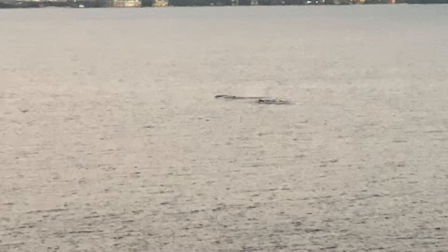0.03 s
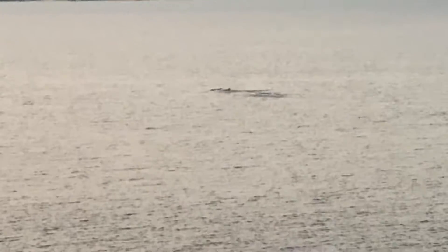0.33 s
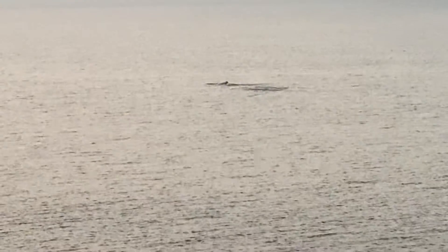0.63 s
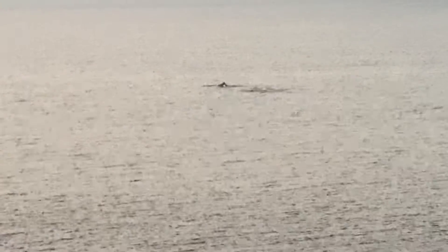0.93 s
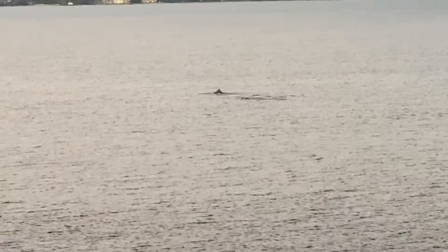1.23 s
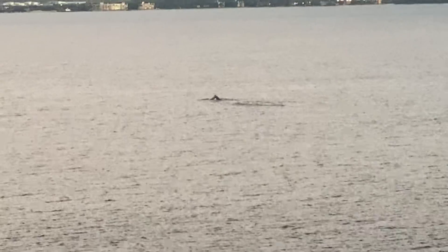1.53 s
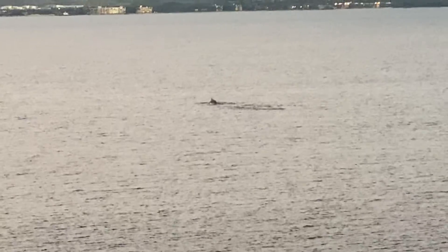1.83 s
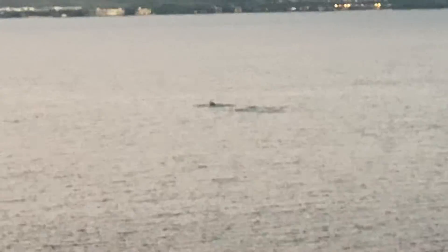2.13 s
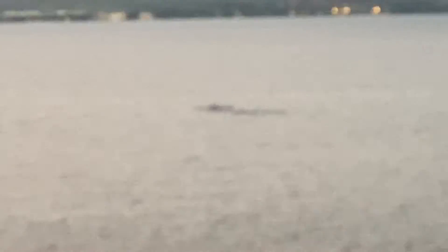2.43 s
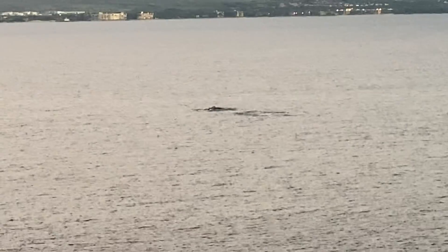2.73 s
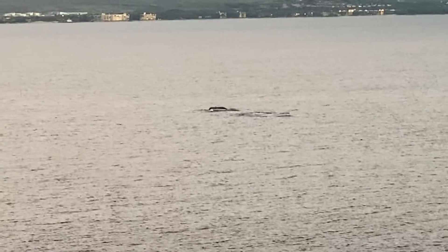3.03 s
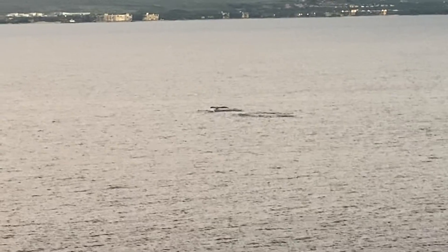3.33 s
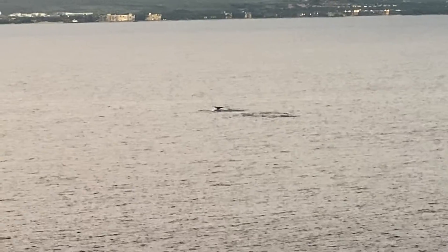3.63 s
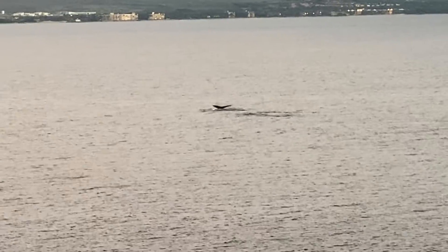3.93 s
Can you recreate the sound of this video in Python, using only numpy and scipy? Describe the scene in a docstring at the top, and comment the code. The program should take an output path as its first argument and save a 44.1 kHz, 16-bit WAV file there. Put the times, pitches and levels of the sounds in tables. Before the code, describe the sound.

Wind buffets the microphone in uneven gusts over a faint wash of distant water.

```python
"""Above the sea, a microphone held out in gusty wind. Right at its port, large eddies rumble and thump,
small ones tear off in a ragged flutter and crackle, and the sharpest of them pop. Far off, the water
washes faintly; it shows in a short lull near 2.4 s, just before a strong gust hits the microphone.
The wind sits close and almost dead centre, with a thin, wider hiss behind it."""
import sys
import numpy as np
from scipy import signal
from scipy.fft import rfft, irfft, next_fast_len
from scipy.io import wavfile
from scipy.ndimage import uniform_filter1d

SR = 44100
rng = np.random.default_rng(int(sys.argv[2]) if len(sys.argv) > 2 else 0)


def unload_audio(sound):
    """Save the sound as a 16-bit wav file, at the path given as the first command line argument."""
    columns = np.transpose(np.atleast_2d(sound))
    # keep every value between -1 and 1, then stretch to whole-number steps
    steps = np.round(np.clip(columns, -1, 1) * 32767)
    wavfile.write(sys.argv[1], SR, steps.astype(np.int16))


N = 176400
T = np.arange(N) / SR


def amp(db):
    """Decibels to gain."""
    return 10 ** (np.asarray(db) / 20)


def unit(x):
    """Scale to rms 1."""
    return x / np.sqrt(np.mean(x ** 2))


def curve(rows):
    """Join (t/s, value) rows by straight lines."""
    return np.interp(T, *np.array(rows).T)


def colour(x, points):
    """Causal filter through (f/Hz, level/dB) points."""
    size = next_fast_len(2 * N)
    hz, db = np.array(points, float).T
    f = np.maximum(np.arange(size // 2 + 1) * SR / size, 1)
    gain = amp(np.interp(np.log(f), np.log(hz), db))
    cepstrum = irfft(np.log(gain), size)
    cepstrum[1:size // 2] *= 2  # fold to minimum phase
    cepstrum[size // 2 + 1:] = 0
    return irfft(rfft(x, size) * np.exp(rfft(cepstrum)), size)[:N]


def noise(points):
    """Noise of rms 1 with the given spectral shape."""
    return unit(colour(rng.standard_normal(N), points))


def walk(hz):
    """Smooth random motion of spread 1, up to about the given rate."""
    f = np.arange(N // 2 + 1) * SR / N
    return unit(irfft(rfft(rng.standard_normal(N)) * np.exp(-(f / hz) ** 2), N))


def steady(x, seconds):
    """Even out the slow swings of a random signal, so that the wind sets its level."""
    power = uniform_filter1d(x ** 2, max(int(seconds * SR), 2))
    return x / np.sqrt(power + 1e-9)


def stereo(mid, side):
    """Left and right from mid and side."""
    return np.array([mid + side, mid - side])


# Push of the large eddies, and of the middling ones, on the microphone: t/s, level/dB
BUFFET_LEVEL = [(0.13, -29.5), (0.52, -32), (0.59, -38), (0.66, -29), (0.85, -33), (1.05, -28.5),
                (1.25, -42.5), (1.41, -32), (1.62, -35), (1.65, -29.5), (1.94, -28), (2.05, -20.5),
                (2.08, -46), (2.12, -20.5), (2.17, -33), (2.21, -23), (2.39, -40), (2.49, -27.5),
                (2.58, -27.5), (2.66, -18), (2.83, -28), (2.87, -23), (3.64, -23), (3.72, -17.5),
                (3.85, -29), (4.0, -30)]
THUD_LEVEL = [(0.13, -35), (0.5, -34.5), (1.11, -40.5), (1.13, -41.5), (1.81, -35.5), (1.89, -48),
              (1.95, -30.5), (2.11, -35.5), (2.16, -58), (2.19, -33.5), (2.39, -63), (2.47, -38),
              (2.58, -39.5), (2.6, -25), (3.15, -22.5), (3.64, -26), (3.67, -19), (3.74, -29.5), (4.0, -27)]
# Their spectral shapes, deep bass and low mids: f/Hz, level/dB
BUFFET_SPECTRUM = [(15, -37), (25, -18.5), (40, -3.5), (60, 5), (80, 2.5), (120, -3.5), (170, -11),
                   (260, -15), (450, -32.5), (2500, -90.5)]
THUD_SPECTRUM = [(50, -24.5), (110, -3.5), (170, 0), (250, -5), (340, -8.5), (460, -14.5), (900, -24.5),
                 (2500, -79.5)]
def rumble():
    """Large eddies push on the port and middling ones thud against it, dead centre."""
    deep = steady(noise(BUFFET_SPECTRUM), seconds=.045) * amp(curve(BUFFET_LEVEL))
    thud = steady(noise(THUD_SPECTRUM), seconds=.071)
    thud *= amp(curve(THUD_LEVEL) - 2 + 2 * walk(hz=110))
    sway = amp(1.5 * walk(hz=21.8))
    return (deep + thud) * sway


# Strength of the airflow over the port: t/s, level/dB
FLOW_LEVEL = [(.13, -37.5), (.19, -40), (.22, -32.5), (.66, -38), (.7, -30), (.75, -39.5), (1, -33.5),
              (1.16, -39), (1.48, -40), (1.65, -36.5), (2.03, -35), (2.08, -48), (2.11, -38.5),
              (2.16, -41.5), (2.2, -37), (2.26, -48), (2.4, -49.5), (2.5, -42), (2.58, -42.5), (2.62, -23),
              (2.655, -45.5), (2.68, -23.5), (2.73, -44.5), (2.77, -25), (2.87, -29), (3.04, -21),
              (3.15, -20), (3.19, -28), (3.36, -24.5), (3.51, -32), (3.57, -23), (3.65, -26.5), (3.76, -32),
              (4, -30.5)]
# Spectral shape of the small eddies: f/Hz, level/dB
FLUTTER_SPECTRUM = [(60, -20.5), (200, -10), (400, 2.5), (750, 3), (1200, -1), (1550, -9), (1900, -16.5),
                    (2500, -25), (3200, -36), (4000, -43), (6000, -52), (9000, -71.5), (15000, -83)]
# Tone of the faint stereo spread of flutter, crackle and sea: f/Hz, level/dB
WIDTH_SPECTRUM = [(100, -68.5), (600, -43.5), (900, -13), (1150, 8.5), (1650, 10), (2200, -5.5), (3000, 12),
                  (4500, 3.5), (15000, -7)]
def flutter(surge):
    """Small eddies tear off the port in bursts of a few milliseconds; faster air sheds smaller ones."""
    bright_hz, bright_db_per_db, usual_flow_db = 1510, .05, -31
    flow_db = curve(FLOW_LEVEL)
    bursts = amp(3.5 * walk(hz=326)) * surge
    eddies = colour(rng.standard_normal(N) * bursts, FLUTTER_SPECTRUM)
    air = amp(-2.5) * steady(eddies, seconds=.093)
    low = signal.sosfiltfilt(signal.butter(2, bright_hz, fs=SR, output="sos"), air)
    brightness = amp(bright_db_per_db * (flow_db - usual_flow_db))
    mid = low + (air - low) * brightness
    side = colour(noise(FLUTTER_SPECTRUM) * unit(bursts), WIDTH_SPECTRUM) * amp(-22.5)
    return stereo(mid, side) * amp(flow_db)


def vortex(at, db, width_ms):
    """A vortex crosses the port: a sharp suction between two pushes."""
    u = (T - at) / (width_ms / 1000)
    return amp(db) * (2 * u ** 2 - 1) * np.exp(-u ** 2)


# The sharpest and the widest eddies to cross the port: t/s, level/dB (unfiltered peak), width/ms
TIGHT_VORTICES = [(0.2316, -20, 0.23), (0.2953, -25, 0.19), (.4818, -22.5, 0.37), (.7, -23.5, 0.3),
                  (0.7056, -21, 0.26), (.8728, -25, 0.26), (.983, -22.5, 0.22), (1.1968, -26, 0.21),
                  (1.4287, -24, 0.25), (1.592, -23.5, 0.29), (1.6224, -24.5, 0.27), (1.7108, -28, 0.16),
                  (1.8272, -23, 0.4), (1.9646, -23, 0.15), (2.0186, -25, 0.17), (2.616, -18, 0.26),
                  (2.7819, -14, 0.49), (2.8142, -12, 0.33), (2.8553, -15, 0.43), (2.898, -16.5, 0.38),
                  (2.907, -12, 0.4), (2.93, -26, 0.18), (2.9492, -8, 0.36), (2.9951, -12.5, .33),
                  (3.0337, -12, 0.45), (3.0497, -6, 0.36), (3.0918, -16.5, 0.22), (3.129, -6.5, 0.28),
                  (3.1325, -12.5, 0.25), (3.1417, -10, .17), (3.1592, -4.5, 0.29), (3.179, -21, 0.35),
                  (3.2574, -18.5, 0.2), (3.2925, -16, 0.21), (3.3226, -21, 0.18), (3.3513, -11, 0.32),
                  (3.3667, -10, 0.43), (3.4436, -14.5, 0.49), (3.578, -18.5, 0.26), (3.6977, -17, 0.23),
                  (3.756, -27, 0.18), (3.8303, -16, 0.41)]
WIDE_VORTICES = [(0.667, -14, 4.8), (1.096, -19, 1.18), (2.114, -19.5, 7.9), (2.221, -16, 6.4),
                 (2.598, -13, 1.74), (2.662, -12.5, 4.6), (3.1, -8.5, 2.25), (3.667, -14.5, 3.6)]
# Tone of the port, and spectral shape of air tearing at its rim: f/Hz, level/dB
PORT_RESPONSE = [(40, -20.5), (400, 3.5), (2000, 2), (2600, -5.5), (4000, -3), (7000, -12), (10000, -31.5),
                 (15000, -33.5)]
TEAR_SPECTRUM = [(500, -16.5), (1800, 6), (3500, 5), (5000, -6), (7500, -18.5), (9000, -31.5), (15000, -50)]
def pops():
    """Tight vortices pop, and the tightest crack brightly as they tear at the rim; wide ones thump."""
    tear_db, tear_ms, fall_db_per_ms = -3, .54, 77
    tight = colour(sum(vortex(*row) for row in TIGHT_VORTICES), PORT_RESPONSE)
    wide = sum(vortex(*row) for row in WIDE_VORTICES)
    tear = np.zeros(N)
    for at, db, width_ms in TIGHT_VORTICES:
        peak = amp(db + tear_db - fall_db_per_ms * width_ms)  # wider vortices tear less
        tear += peak * np.exp(-np.abs(T - at) * 1000 / tear_ms)
    return tight + tear * noise(TEAR_SPECTRUM) + wide


# Crackling treble, right at the microphone: t/s, level/dB
SPIT_LEVEL = [(.13, -53), (.25, -52), (.38, -52), (.82, -50.5), (1, -48), (1.15, -50), (1.48, -50.5),
              (1.6, -47), (1.97, -45.5), (2.15, -53), (2.3, -61), (2.58, -63), (2.62, -48), (2.72, -65),
              (2.85, -44.5), (3.04, -34.5), (3.11, -39.5), (3.14, -30), (3.19, -45), (3.35, -39),
              (3.51, -51), (3.6, -42), (3.8, -54), (4, -50)]
# Spectral shape of one spit: f/Hz, level/dB
SPIT_SPECTRUM = [(200, -24), (900, -2), (1900, 7.5), (2600, -3.5), (3300, -11.5), (4200, -21.5),
                 (6000, -30), (9000, -52.5), (15000, -61.5)]
def crackle(surge):
    """The smallest eddies strike the rim of the port one by one: sharp spits of uneven size."""
    spits_per_s, spread_db = 330, 5
    sizes = amp(spread_db * np.clip(rng.standard_normal(N), -2, 2))
    signs = rng.choice([-1, 1], N)
    strikes = rng.random(N) < spits_per_s / SR
    spits = colour(strikes * sizes * signs * surge, SPIT_SPECTRUM)
    mid = steady(spits, seconds=.21)
    side = colour(noise(SPIT_SPECTRUM) * unit(surge), WIDTH_SPECTRUM) * amp(-18.5)
    return stereo(mid, side) * amp(curve(SPIT_LEVEL))


# Spectral shape of the sea from a distance: f/Hz, level/dB
WASH_SPECTRUM = [(60, -9.5), (300, -4), (700, -13.5), (1200, -3), (1600, -8.5), (1900, -4.5), (2500, -23.5),
                 (4200, -28), (7000, -41.5), (15000, -60.5)]
def sea():
    """Water washes far from the microphone, its level wavering slightly."""
    mid = noise(WASH_SPECTRUM)
    side = amp(-14.5) * colour(noise(WASH_SPECTRUM), WIDTH_SPECTRUM)
    return stereo(mid, side) * amp(-52 + 1.3 * walk(hz=9))


# Faint treble behind the wind: t/s, level/dB
HISS_BED_LEVEL = [(.12, -62), (2.12, -62.5), (2.3, -76), (2.58, -71), (2.62, -64), (4, -62)]
# Its spectral shape: f/Hz, level/dB
HISS_SPECTRUM = [(1000, 6.5), (3000, 6.5), (4500, -5.5), (6000, -3.5), (7800, -8), (8600, -22), (9600, -9),
                 (11500, -25.5), (15000, -29)]
def hiss():
    """A faint background hiss, wider at the top, that sinks in the lull."""
    width = [(300, -29), (2000, -3), (4500, -15), (6500, -7), (15000, 13)]  # f/Hz, level/dB
    side = amp(-3.5) * colour(noise(HISS_SPECTRUM), width)
    return stereo(noise(HISS_SPECTRUM), side) * amp(curve(HISS_BED_LEVEL))


def scene():
    """Wind up close, sea far off; flutter and crackle sputter with the same quick surges."""
    surge = amp(2.33 * walk(hz=55))
    return rumble() + flutter(surge) + crackle(surge) + pops() + sea() + hiss()


def record(dry):
    """The microphone opens just after the start; the deepest bass and the top are cut."""
    open_s, low_hz, top_hz = .1205, 30, 15200
    opened = dry * np.clip((T - open_s) / .002, 0, 1)
    thinned = signal.sosfilt(signal.butter(2, low_hz, "highpass", fs=SR, output="sos"), opened)
    return signal.sosfilt(signal.ellip(8, .2, 70, top_hz, fs=SR, output="sos"), thinned)


dry = scene()
out = record(dry)
unload_audio(out)
```